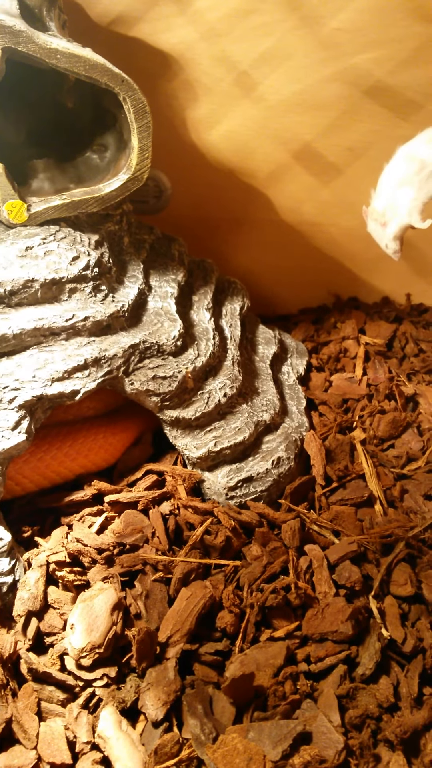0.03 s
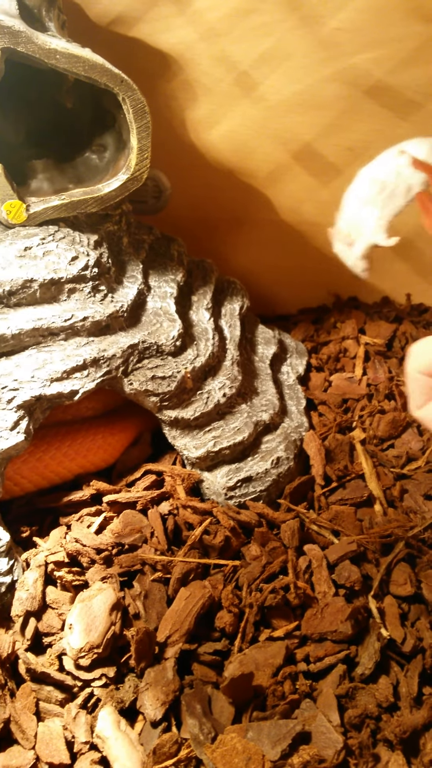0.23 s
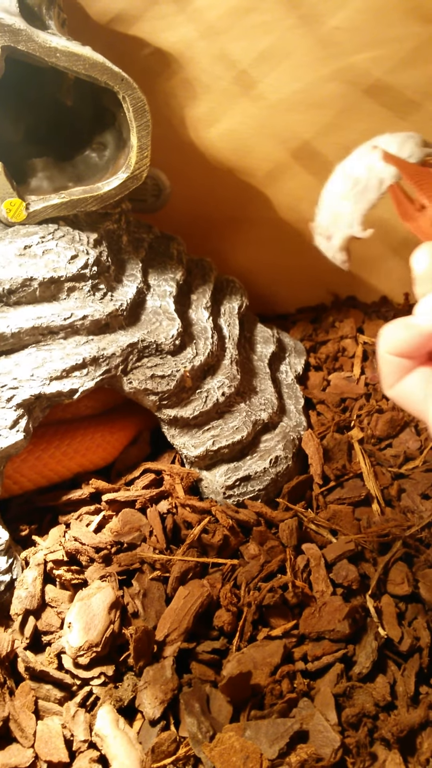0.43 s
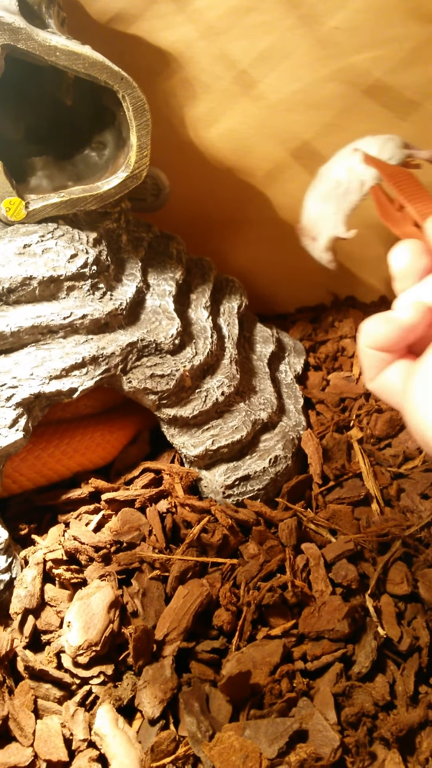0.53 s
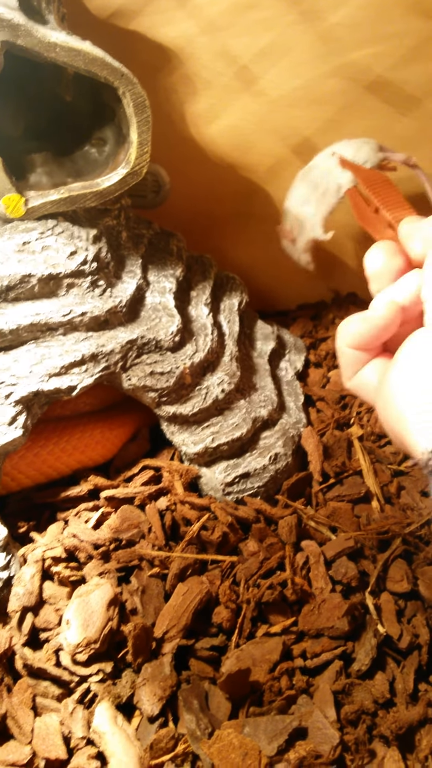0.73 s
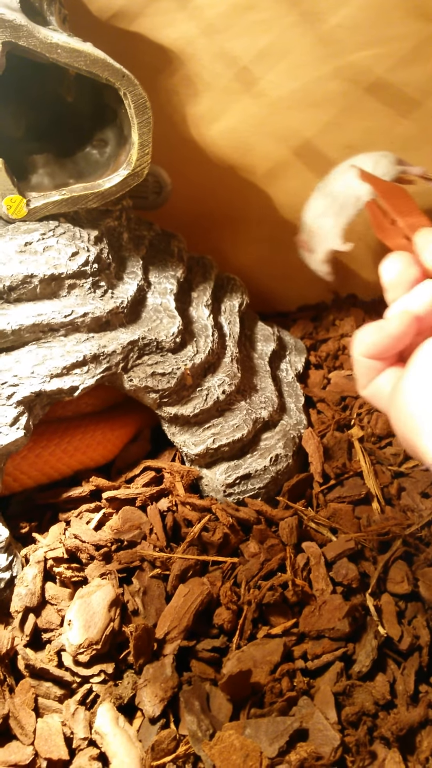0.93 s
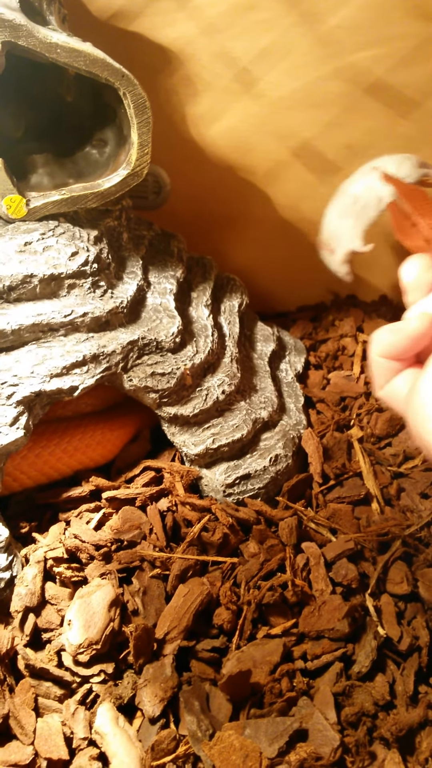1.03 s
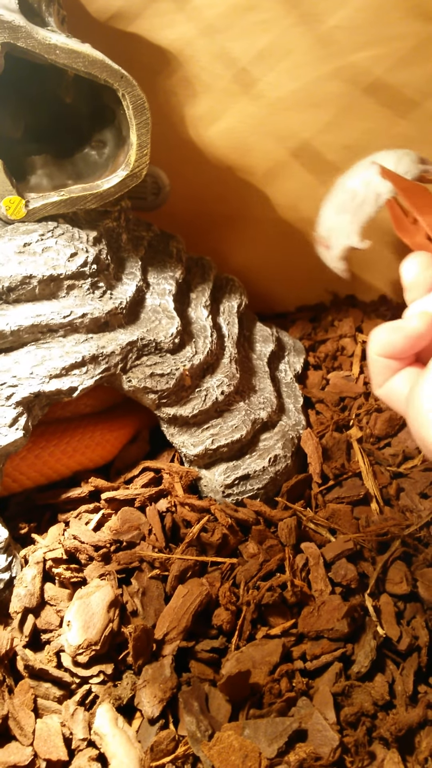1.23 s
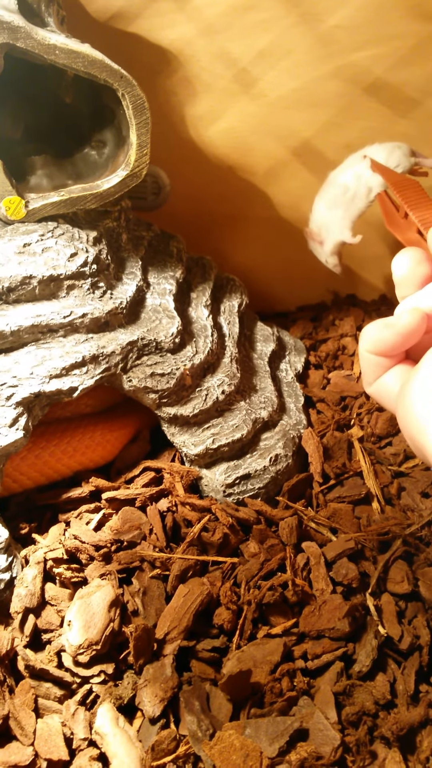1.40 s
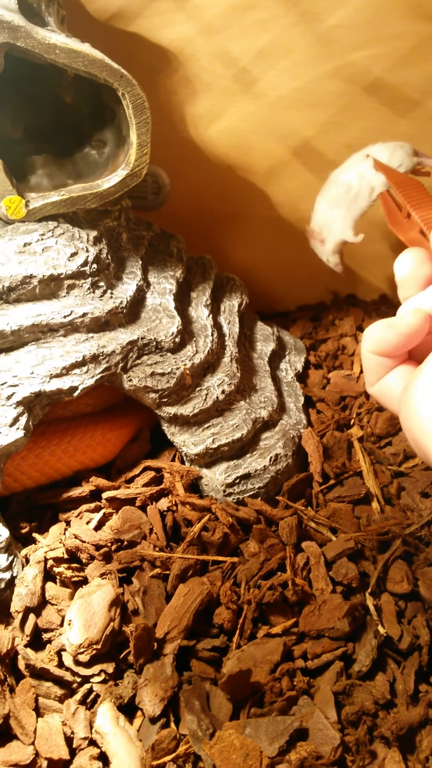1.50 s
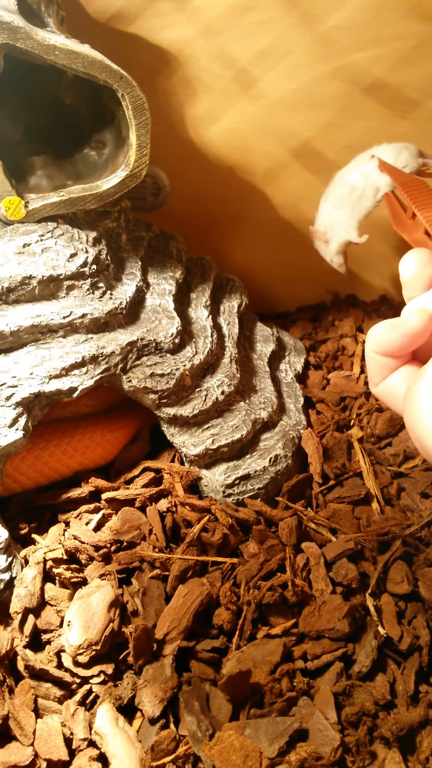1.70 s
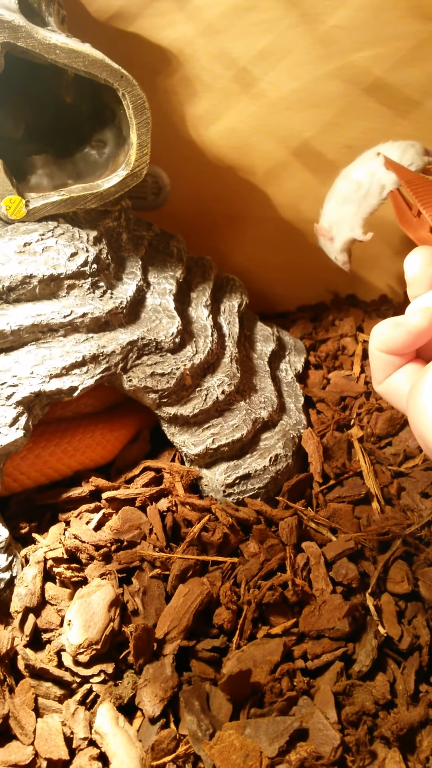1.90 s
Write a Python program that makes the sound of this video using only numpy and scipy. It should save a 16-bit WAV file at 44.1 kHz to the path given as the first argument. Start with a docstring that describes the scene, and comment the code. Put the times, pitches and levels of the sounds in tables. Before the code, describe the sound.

A snake gives one short, bright hiss as bark chips tick and rustle faintly.

```python
"""One short, bright hiss among light ticks and a faint rustle, over a low wavering room drone and steady air.
A snake under a hide in an enclosure shifts: its scales slide over bark chips, which tick and knock.
Its hiss is a jet of air with a resonance near 7 kHz, coloured by the hollow of the hide and the walls.
A close stereo microphone picks it all up."""
import sys
import numpy as np
from scipy import signal
from scipy.fft import rfft, irfft
from scipy.io import wavfile

SR = 44100
rng = np.random.default_rng(int(sys.argv[2]) if len(sys.argv) > 2 else 0)


def output_pcm(signal):
    """Save a mono or channel-first signal as 16-bit PCM at the path in sys.argv[1].

    Samples are clipped to [-1, 1] before scaling.
    """
    pcm = np.clip(np.atleast_2d(signal).T, -1, 1) * 32767
    wavfile.write(sys.argv[1], SR, np.round(pcm).astype(np.int16))


N = 85995


def undb(db):
    """Decibels to gain."""
    return 10 ** (np.asarray(db) / 20)


def unit(x):
    """Scale to rms 1."""
    return x / np.sqrt(np.mean(x ** 2))


def curve(rows):
    """Per-sample control, linear between (time [s], value) rows."""
    return np.interp(np.arange(N) / SR, *np.array(rows).T)


def bins_hz():
    """FFT bin frequencies, floored at 1 Hz."""
    return np.maximum(np.fft.rfftfreq(N, 1 / SR), 1)


def colour(rows):
    """Gain per bin for each dB column, interpolated over log frequency."""
    hz, *columns = np.array(rows).T
    return undb([np.interp(np.log(bins_hz()), np.log(hz), db) for db in columns])


def resonance(hz, width_hz):
    """Gain per bin of a steep resonance."""
    detuning = (bins_hz() ** 2 - hz ** 2) / (bins_hz() * width_hz)
    return 1 / (1 + detuning ** 2)


def noise(gain, shared):
    """Coloured stereo noise, rms 1; shared is the power fraction common to both sides."""
    white = rng.standard_normal((3, N))
    stereo = np.sqrt(shared) * white[2] + np.sqrt(1 - shared) * white[:2]
    return unit(irfft(rfft(stereo) * gain, N))


def waver(rate_hz):
    """Smooth random control, rms 1."""
    lowpassed = rfft(rng.standard_normal(N)) / (1 + (bins_hz() / rate_hz) ** 2)
    return unit(irfft(lowpassed, N))


def room():
    """A low drone wavers in pitch and level over rumble and a steady hiss of air."""
    # drone envelope (time [s], level [dB])
    drone_level = [(0, -73.5), (.14, -65), (.17, -58), (.245, -69.5), (.29, -53.5), (.41, -54), (.45, -61),
                   (.56, -44.5), (.61, -64.5), (.68, -47.5), (.72, -61), (.81, -58), (.85, -50),
                   (.95, -66.5), (1.05, -56), (1.19, -61), (1.3, -56.5), (1.44, -61), (1.58, -65.5),
                   (1.72, -52.5), (1.81, -59), (1.87, -65.5), (1.95, -57)]
    # rumble spectrum (frequency [Hz], relative level [dB])
    rumble_spectrum = [(20, -36), (31, -19), (46, 7.5), (60, -7), (80, 1), (120, -1.5), (160, 0),
                       (195, -12.5), (240, -8.5), (320, -24.5), (430, -11), (550, -28), (750, -20),
                       (1500, -50), (4000, -48)]
    # background hiss spectrum (frequency [Hz], relative left [dB], relative right [dB])
    air_spectrum = [(100, -3, -4), (990, 5.5, 3.5), (5700, -3.5, 1.5), (7600, -3, -3.5), (8070, -27, 9),
                    (8730, -13, 11.5), (8800, -10, 0.5), (11300, -1.5, -1), (14400, 0, 3.5)]
    drone_hz, wander_hz, waver_db = 99.4, 5.76, 2.9
    rumble_db, air_db = -65.5, -68.5
    left_lag_s, left_db = .0001, -0.5
    phase = 2 * np.pi * np.cumsum(drone_hz + wander_hz * waver(rate_hz=17.3)) / SR
    drone = unit(np.sin(phase)) * undb(curve(drone_level) + waver_db * waver(rate_hz=48))
    left, right = drone + undb(rumble_db) * noise(colour(rumble_spectrum), shared=0.85)
    t = np.arange(N) / SR
    left = undb(left_db) * np.interp(t - left_lag_s, t, left)
    air = undb(air_db) * noise(colour(air_spectrum), shared=0.1)
    return np.array([left, right]) + air


def rustle():
    """Scales slide over the bark in fine grains."""
    # rustle envelope (time [s], level [dB])
    rustle_level = [(0, -74.5), (.19, -68), (.27, -61), (.33, -62), (.8, -61), (.88, -64), (.97, -69),
                    (1.25, -69), (1.32, -66.5), (1.36, -67.5), (1.42, -67), (1.51, -68.5), (1.55, -74),
                    (1.74, -65.5), (1.95, -73)]
    # rustle spectrum (frequency [Hz], relative left [dB], relative right [dB])
    rustle_spectrum = [(298, -2.5, -2), (1560, -15.5, -14.5), (3630, -11, -18), (5660, -9.5, -11),
                       (7760, -7, -1.5), (9800, -11, -6), (14700, -14, -15.5)]
    friction = noise(colour(rustle_spectrum), shared=0)
    grain_db = 2 * waver(rate_hz=410)
    return friction * undb(curve(rustle_level) + grain_db)


def decay(start_s, t60_s):
    """Envelope: silent until start_s, then falling from 1 by 60 dB per t60_s."""
    age_s = np.arange(N) / SR - start_s
    return np.exp(-np.log(1000) * np.maximum(age_s, 0) / t60_s) * (age_s >= 0)


def chip(start_s, db, hz, t60_s, width_ratio):
    """A chip snaps and dies away fast; the walls add a short tail."""
    body = resonance(hz, width_ratio * hz)
    snap = noise(body, shared=0.1) * decay(start_s, t60_s)
    tail = undb(-16) * noise(body, shared=0) * decay(start_s, t60_s=0.19)
    return undb(db) * (snap + tail)


def bark():
    """Chips tick, and knock more dully against each other, as the snake shifts on them."""
    # chip ticks (time [s], level [dB], pitch [Hz], t60 [s], left minus right [dB])
    tick_events = [(0.2126, -43, 8600, .006, -12), (0.215, -55, 9500, .012, -6),
                   (0.2251, -33, 7520, 0.023, -3), (.265, -44.5, 8000, 0.0087, -11),
                   (0.2692, -42, 6700, 0.0052, 14), (0.2744, -47, 8150, 0.028, -7),
                   (0.3168, -39.5, 7070, 0.018, -5), (0.4868, -27.5, 7000, 0.02, 0),
                   (.6712, -28, 6200, 0.0021, 10)]
    # chip knocks (time [s], level [dB], pitch [Hz], t60 [s])
    knock_events = [(0.2255, -56, 1500, 0.0055), (0.228, -47, 5270, 0.027), (0.2274, -50.5, 3600, 0.016),
                    (.318, -47.5, 4360, 0.021), (0.346, -47, 1020, 0.0059), (.384, -40, 4160, 0.023),
                    (.474, -51.5, 2020, .05), (0.485, -43.5, 1780, .05), (0.487, -46, 2350, 0.053),
                    (0.4845, -47, 3480, 0.056)]
    chips = np.zeros((2, N))
    for start_s, db, hz, t60_s, pan_db in tick_events:
        side_gain = undb([[pan_db / 2], [-pan_db / 2]])
        chips += side_gain * chip(start_s, db, hz, t60_s, width_ratio=0.42)
    for start_s, db, hz, t60_s in knock_events:
        chips += chip(start_s, db, hz, t60_s, width_ratio=0.13)
    return chips


def jet():
    """The snake hisses: a fluttering jet of air."""
    # force of the hiss (time [s], relative level [dB])
    effort_level = [(.26, -63), (.33, -22), (.372, -13.5), (.403, -5), (.452, -4.5), (.485, 0), (.54, -1),
                    (.595, 1.5), (.665, 0), (.745, -6.5), (.795, -29.5), (.86, -41), (.95, -70)]
    # jet spectrum (frequency [Hz], relative left [dB], relative right [dB])
    jet_spectrum = [(304, -44, -36), (1470, -35, -27.5), (2390, -30, -26.5), (2920, -27.5, -24.5),
                    (3200, -29, -29), (3510, -22.5, -24), (4400, -17.5, -24), (4680, -21, -20),
                    (5100, -10.5, -39), (5850, -14.5, -14.5), (6680, -4, -21), (7240, 1, -25),
                    (7640, -5.5, -6), (7900, -18, -8.5), (8600, -8.5, -8.5), (9400, -11.5, -14.5),
                    (10600, -21, -21), (12900, -17, -25), (14500, -24, -31.5)]
    jet_db = -36.5
    turbulence = noise(colour(jet_spectrum), shared=0.055)
    flutter_db = 0.7 * waver(rate_hz=110)
    return turbulence * undb(jet_db + curve(effort_level) + flutter_db)


def walls(x):
    """Quick echoes between the enclosure walls, different on each side, ripple the spectrum."""
    echoes = rng.standard_normal((2, N)) * decay(start_s=0, t60_s=0.11)
    echoes /= np.sqrt(np.sum(echoes ** 2, axis=1, keepdims=True))
    return x + undb(-4) * signal.fftconvolve(x, echoes, axes=1)[:, :N]


def hollow():
    """The hollow under the hide rings during the hiss: its throaty part."""
    # cavity resonances (frequency [Hz], width [Hz], relative left [dB], relative right [dB])
    hollow_modes = [(147, 78, 3, 11), (241.2, 31.5, 8.5, 10), (446.4, 78, 3.5, 4.5), (557, 39, -7.5, 0.5),
                    (712, 55, 3.5, 1.5), (856, 210, -25, -7.5), (1034.5, 72, 6.5, -2),
                    (1393, 78, -10.5, -0.5), (1793, 155, -20, -3.5), (1970, 140, -1.5, -10),
                    (2213, 88, -1, -4), (2990, 116, -7, 2)]
    # ring envelope (time [s], level [dB])
    hollow_level = [(.15, -100), (.27, -69.5), (.32, -67), (.35, -62), (.4, -55.5), (.44, -56), (.5, -55.5),
                    (.57, -54.5), (.675, -53.5), (.75, -55.5), (.8, -63.5), (.9, -81), (1.05, -94)]
    response = sum(undb([[left_db], [right_db]]) * resonance(hz, width_hz)
                   for hz, width_hz, left_db, right_db in hollow_modes)
    return noise(response, shared=0.33) * undb(curve(hollow_level))


def scene():
    """Room, stirring bark and the snake's hiss, in stereo."""
    return room() + rustle() + bark() + walls(jet()) + hollow()


def record(dry):
    """The recorder cuts the top steeply."""
    cutoff_hz = 14550
    lowpass = signal.ellip(12, .2, 70, cutoff_hz, fs=SR, output="sos")
    return signal.sosfilt(lowpass, dry)


dry = scene()
out = record(dry)
output_pcm(out)
```